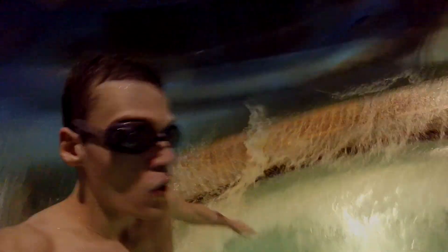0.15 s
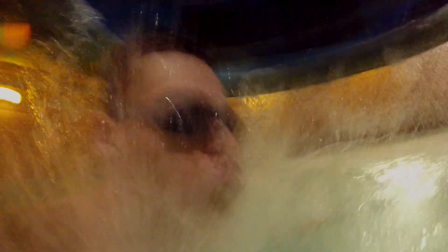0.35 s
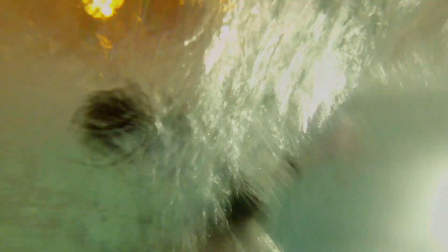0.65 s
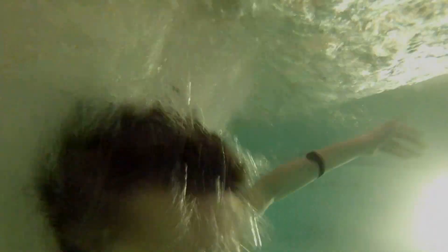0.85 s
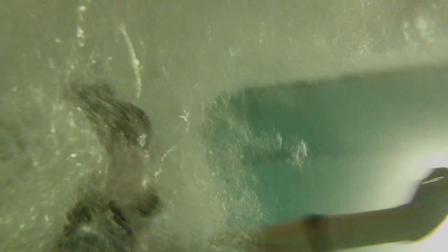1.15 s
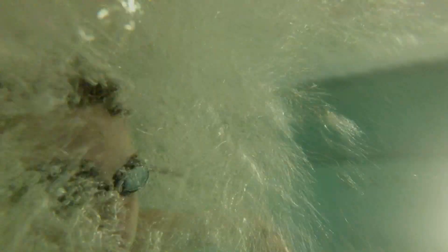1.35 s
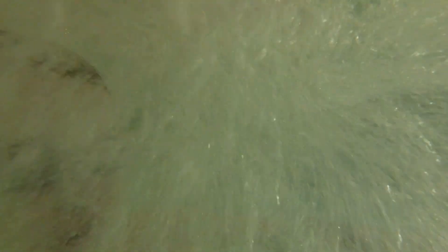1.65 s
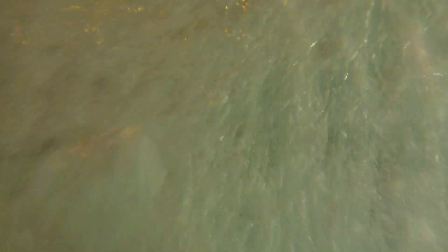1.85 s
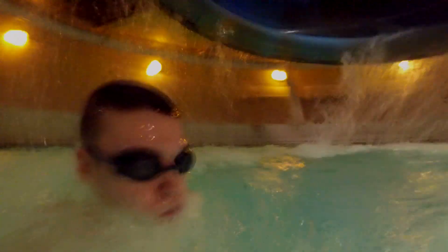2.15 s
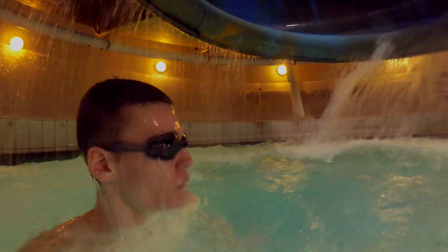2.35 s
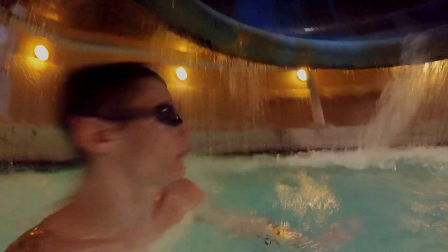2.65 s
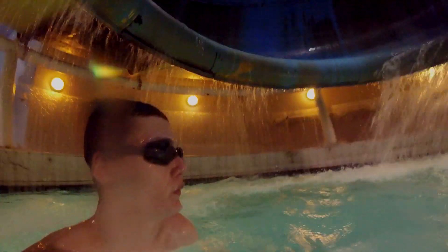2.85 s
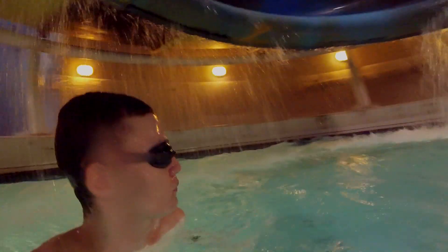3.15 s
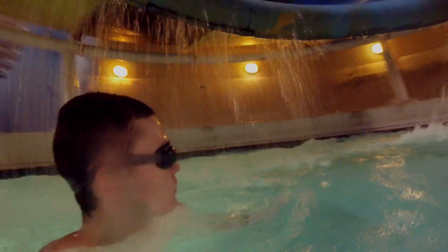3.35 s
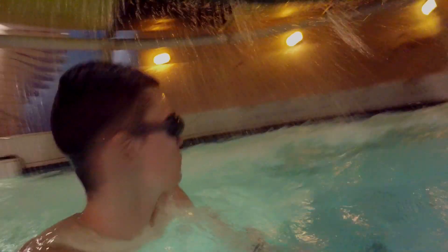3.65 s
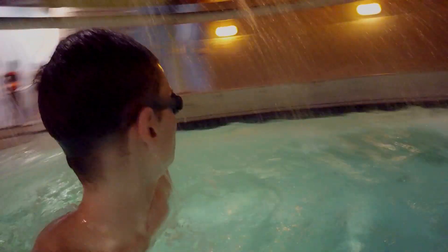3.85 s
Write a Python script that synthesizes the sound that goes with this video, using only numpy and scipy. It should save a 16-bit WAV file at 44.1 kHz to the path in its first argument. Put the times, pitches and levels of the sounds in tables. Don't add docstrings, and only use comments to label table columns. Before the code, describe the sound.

Water roar at an indoor pool, a hard plunge, bubbly submersion, then surfacing into brightening rush

```python
import sys
import numpy as np
from scipy import signal
from scipy.fft import rfft, irfft, next_fast_len
from scipy.io import wavfile
from scipy.ndimage import uniform_filter1d, map_coordinates

SR = 44100
rng = np.random.default_rng(int(sys.argv[2]) if len(sys.argv) > 2 else 0)


def put_to_file(sound):
    columns = np.atleast_2d(sound).T
    safe = np.clip(columns, -1, 1)
    whole_steps = np.round(safe * 32767)
    wavfile.write(sys.argv[1], SR, whole_steps.astype(np.int16))


def voltage_ratio(decibels):
    exponent = np.asarray(decibels, float) / 20
    return 10 ** exponent


N = 176400


def unit(x):
    return x / np.sqrt(np.mean(x ** 2) + 1e-20)


def along(points, hz):
    f, v = np.transpose(points)
    return np.interp(np.log(hz + 1), np.log(f + 1), v)


def curves(rows):
    s, db, *cols = np.transpose(rows)
    t = np.arange(N) / SR
    gate = np.clip(np.minimum(t - s[0] + .01, s[-1] + .01 - t) * 100, 0, 1)
    return [gate * voltage_ratio(np.interp(t, s, db))] + [np.interp(t, s, c) for c in cols]


def wobble(rate):
    knots = rng.standard_normal(int(N * rate / SR) + 4)
    return map_coordinates(knots, [np.arange(N) * rate / SR])


def filtered(x, response):
    m = next_fast_len(N + SR // 2)
    return irfft(rfft(x, m) * response(np.fft.rfftfreq(m, 1 / SR)), m)[:N]


def coloured(x, spectrum):
    return unit(filtered(x, lambda hz: voltage_ratio(along(spectrum, hz))))


def rush(spectrum, patchy_db):
    z = signal.stft(rng.standard_normal(N), nperseg=256)[2]
    field = uniform_filter1d(rng.standard_normal(z.shape), size=4, axis=0)
    field = uniform_filter1d(field, size=8, axis=1)
    x = signal.istft(z * voltage_ratio(patchy_db * unit(field)), nperseg=256)[1][:N]
    return coloured(x, spectrum)


def bubbles(spectrum, low_hz, octaves, cycles, rise, spread_db, count):
    u, t = rng.random((count, 3)), np.arange(1500) / SR
    hz = low_hz * 2 ** (octaves * u[:, 1:2])
    life = np.minimum(cycles / hz, t[-1])
    tone = np.sin(2 * np.pi * hz * t * (1 + rise * t / life))
    tone = tone * np.exp(-3 * t / life) * (1 - np.exp(-t * hz))
    size = voltage_ratio(-spread_db * np.log(u[:, 2:] + 0.055)) * hz
    at = (u[:, :1] * N).astype(int) + np.arange(len(t))
    x = np.bincount(at.ravel(), (tone * size).ravel(), N)[:N]
    return coloured(x, spectrum)


# (time [s], level [dB])
ROAR_LEVEL = [(0, -19), (.44, -18.5), (.444, -38.5), (.471, -37), (.475, -57.5), (.515, -43), (.57, -51),
              (.62, -52.5), (.68, -54), (.72, -59), (.745, -62)]
# (frequency [Hz], level [dB])
ROAR_LOW = [(12, -28), (214, -8.5), (950, -16), (1600, -15), (2250, -8), (2700, -18), (3900, -40.5),
            (6600, -85)]
ROAR_TREBLE = [(2500, -41.5), (4570, -18), (5840, -17.5), (6500, -4), (7500, -13.5), (9100, 2),
               (10000, -15), (10200, -59), (11000, -94)]
SUNK_TREBLE = [(2500, -21.5), (3500, -14), (5500, -22), (6500, -3), (7500, -20), (10000, -52)]
SLOSH_SPECTRUM = [(12, -5), (40, 26.5), (280, 16.5), (700, -65.5)]


def waterfall():
    level, = curves(ROAR_LEVEL)
    sunk = np.arange(N) > 0.475 * SR
    slosh = voltage_ratio(-6) * unit(voltage_ratio(2.5 * wobble(25)) * rush(SLOSH_SPECTRUM, 2.5))
    low = voltage_ratio(0.4 * wobble(40)) * rush(ROAR_LOW, 2.5)
    treble = voltage_ratio(-19.5) * np.where(sunk, 0.88 * rush(SUNK_TREBLE, 3), rush(ROAR_TREBLE, 0.46))
    spatter = np.where(sunk, unit(voltage_ratio(5.7 * wobble(59.1))), 1)
    return level * spatter * (low + treble + slosh)


# (time [s], level [dB])
FILM_LEVEL = [(1.98, -56.5), (2.09, -49), (2.115, -43), (2.4, -37), (2.553, -34.5), (2.556, -62.5),
              (2.61, -55)]
# (frequency [Hz], level [dB])
FILM_SPECTRUM = [(60, -20), (500, 0), (1000, 6), (2200, 0), (2600, -14), (5500, -19), (8000, -38),
                 (14000, -100)]


def wet_port():
    level, = curves(FILM_LEVEL)
    return level * rush(FILM_SPECTRUM, 0.79)


def port(x, peak_hz):
    notch_ratio, notch_wide_hz, peak_wide_hz = 1.205, 298, 525
    f, t, z = signal.stft(x, SR, nperseg=512)
    f, c = f[:, None], np.interp(t, np.arange(N) / SR, peak_hz)
    dip = (c * notch_ratio) ** 2 - f * f + 1j * f * notch_wide_hz
    peak = c * c - f * f + 1j * f * peak_wide_hz
    return unit(signal.istft(z * np.abs(dip / peak), SR, nperseg=512)[1][:N])


# (time [s], level [dB], port cleared [0-1], port resonance [Hz])
DRAINING = [(2.625, -51, 0.04, 5690), (2.85, -37, 0, 5900), (3.15, -32.5, 0.03, 5760),
            (3.4, -31, 0.76, 4420), (3.7, -27, 0.92, 4320), (3.962, -25, 0.96, 4120),
            (3.968, -40, 0.52, 4130), (4, -33, 1, 4180)]
# (frequency [Hz], level [dB])
DAMP_SPECTRUM = [(25, -0.5), (450, -0.5), (750, 2.5), (1950, 5), (2700, -3), (7200, -5), (9000, -27.5),
                 (12000, -71)]
CLEAR_SPECTRUM = [(25, -13.5), (400, -3.5), (3000, -11), (6000, -17.5), (6600, -4), (7500, -14),
                  (11500, -30.5), (13000, -79.5)]


def draining_port():
    level, cleared, peak_hz = curves(DRAINING)
    cleared = np.clip(cleared, 0, 1)
    damp = np.sqrt(1 - cleared) * rush(DAMP_SPECTRUM, 1)
    clear = np.sqrt(cleared) * port(rush(CLEAR_SPECTRUM, 0.61), peak_hz)
    return level * (damp + clear)


# (time [s], level [dB], small bubbles [0-1])
CLOUD_LEVEL = [(.54, -38.5, 1), (.62, -37.5, 0), (.67, -41.5, 0.08), (.71, -48, 0.94), (.75, -30, 1),
               (.8, -30.5, 0), (.86, -34.5, 0), (.95, -37.5, 0.07), (1.05, -32, 0.2), (1.2, -28, 0.76),
               (1.33, -34.5, 0.5), (1.41, -30, 0.57), (1.47, -34, 0.83), (1.6, -32, 0.65),
               (1.74, -27.5, 0.6), (1.8, -31.5, 0.74), (1.9, -29.5, 0.99), (2.35, -53.5, 1)]
# (frequency [Hz], level [dB])
BIG_BUBBLES = [(150, -31.5), (250, -11.5), (600, -11), (850, -25.5), (2000, -48), (3000, -62.5),
               (8000, -100)]
SMALL_BUBBLES = [(330, -2), (520, -6.5), (850, 1.5), (1080, -7.5), (1340, -32.5), (2300, -49.5),
                 (6000, -63), (9000, -100)]
CRACKLE_SPECTRUM = [(800, -27.5), (2000, -4), (3200, -18.5), (7000, -27.5), (10000, -69)]


def bubbly_wash(spectrum):
    ringing = bubbles(spectrum, 150, 3.3, cycles=11, rise=.09, spread_db=2, count=1300)
    return unit(ringing + .8 * rush(spectrum, 2.5))


def bubble_cloud():
    level, small = curves(CLOUD_LEVEL)
    small = np.clip(small, 0, 1)
    cloud = np.sqrt(1 - small) * bubbly_wash(BIG_BUBBLES) + np.sqrt(small) * bubbly_wash(SMALL_BUBBLES)
    fizz = bubbles(CRACKLE_SPECTRUM, 1200, 1.6, cycles=6.2, rise=.03, spread_db=15.5, count=900)
    snaps = bubbles(CRACKLE_SPECTRUM, 2500, 0.84, cycles=1.6, rise=0, spread_db=6.5, count=200)
    return level * (cloud + voltage_ratio(-45) * (fizz + 0.2 * snaps))


# (time [s], level [dB], frequency [Hz], negative
# pulls first, ring to -30 dB [s])
GLUG_EVENTS = [(.496, -17.5, 389, 0.0064), (0.521, 1, 594, 0.0016), (0.53, -3.5, -80.5, 0.019),
               (0.549, -15.5, 575, 0.018), (0.565, -8.5, -480, 0.01), (0.612, -15.5, 572, 0.014),
               (0.7564, -3.5, 66, 0.017), (0.763, 14, -135, 0.004), (0.766, -16.5, 242.5, 0.064),
               (0.795, -14, 257, 0.049), (1.2058, -8, 1340, 0.0053), (1.2048, -17, 2554, 0.005),
               (1.2055, -9.5, 195, 0.0073), (1.97, -16.5, 40.5, 0.15), (2.084, -16.5, 62, 0.036),
               (2.096, -18, -98, 0.032), (2.108, -17, -190, 0.017), (2.257, -11, -53.5, 0.11),
               (2.303, -11, -105, 0.026)]
# (time [s], level [dB], frequency [Hz])
SURGE_EVENTS = [
    (0.03, -11, 223),
    (0.103, -12.5, 166),
    (0.194, -24, 173),
    (0.267, -11, 263),
    (0.358, -19.5, 184),
]


def glugs():
    out, t = np.zeros(N + SR), np.arange(SR // 4) / SR
    surges = [(s, db + 0.5, hz, 3 / hz) for s, db, hz in SURGE_EVENTS]
    for s, db, hz, rings in GLUG_EVENTS + surges:
        shape = voltage_ratio(db - 1 - 30 * t / rings) * (1 - np.exp(-10 * t * abs(hz))) ** 2
        out[round(s * SR):][:len(t)] += shape * np.sin(2 * np.pi * hz * t)
    return out[:N]


# (time [s], level [dB], decay to -60 dB [s])
SLAP_EVENTS = [
    (0.4958, -30, 0.0091),
    (0.5228, -10, 0.0018),
    (.529, -4.5, 0.013),
    (0.758, -25, 0.03),
    (1.2063, -21, 0.0035),
    (1.89, -41, 0.016),
]
# (frequency [Hz], bandwidth [Hz], level [dB])
CASE_MODES = [(1333, 377, 8.5), (2000, 710, 8), (2614, 576, 2.5), (6370, 460, -13), (8600, 1200, -25.5)]


def peaks(table, f):
    return sum((-1) ** k * voltage_ratio(db) * 1j * f * w / (c * c - f * f + 1j * f * w)
               for k, (c, w, db) in enumerate(table))


def slaps():
    out, t = np.zeros(N + SR), np.arange(SR // 4) / SR
    for s, db, t60 in SLAP_EVENTS:
        shape = voltage_ratio(db + 10.0 - 60 * t / t60) * (1 - np.exp(-9 * t / t60))
        out[round(s * SR):][:len(t)] += shape * rng.standard_normal(len(t))
    return filtered(out[:N], lambda f: 0.011 / (1 + 1j * f / 6000) + peaks(CASE_MODES, f))


# (time [s], level [dB])
FILM_POPS = [
    (2.6113, -3),
    (2.72, -29),
]


def film_pops():
    input_hz, input_damp, leak_hz, snap_hz = 39.5, 1.33, 9.8, 2206
    step = np.zeros(N)
    for s, db in FILM_POPS:
        step[round(s * SR)] = -voltage_ratio(db) * SR / (2 * np.pi)

    def response(f):
        vent = 1j * f / (1j * f + leak_hz)
        high_pass = -1j * f / (f * f - input_hz ** 2 - 1j * f * input_damp * input_hz)
        return vent * high_pass / (1 + 1j * f / snap_hz)

    return filtered(step, response)


# (time [s], level [dB], frequency
# [Hz])
TICK_EVENTS = [(0.5287, -7.5, 2040), (0.562, -25, 1880), (0.609, -29.5, 2360), (.793, -22.5, 1870),
               (.848, -39.5, 1920), (1.04, -42.5, 2120), (1.198, -39.5, 3500), (1.203, -47, 5000),
               (1.228, -60, 3700), (0.935, -49, 1950), (.9, -47, 2100), (1.172, -53, 2200),
               (1.264, -48, 2600), (1.718, -41, 1980), (1.995, -54, 4270), (2.004, -54, 4180),
               (.652, -45, 2400), (.683, -43, 2130), (1.244, -34.5, 2500), (1.718, -38, 1590),
               (1.719, -47, 3026), (1.766, -50.5, 3200), (1.823, -43, 1905), (1.858, -46, 2940),
               (1.951, -41, 1870), (1.961, -34, 3150), (1.984, -32.5, 1730), (1.9815, -22, 877),
               (2.0231, -13.5, 1034), (0.912, -49, 2300)]


def ticks():
    out, t = np.zeros(N + SR), np.arange(SR // 4) / SR
    for s, db, hz in TICK_EVENTS:
        rough = 1 + 0.12 * map_coordinates(rng.standard_normal(230), [t * 900])
        shape = voltage_ratio(db + 1 - 60 * t * hz / 33) * (1 - np.exp(-1.6 * t * hz)) ** 2
        out[round(s * SR):][:len(t)] += shape * rough * np.sin(2 * np.pi * hz * t)
    return out[:N]


# (time [s], level [dB], frequency [Hz])
BLOOP_EVENTS = [(0.716, -24, 850), (0.895, -21, 715), (0.928, -27, 455), (1.029, -20, 859),
                (1.047, -27, 556), (1.094, -24, 452), (1.128, -20, 667), (1.167, -20, 490),
                (1.183, -14.5, 748), (1.224, -14.5, 704), (1.23, -22.5, 764), (1.248, -17.5, 817),
                (1.278, -26.5, 490), (1.409, -14.5, 741), (1.496, -17.5, 894), (1.522, -21.5, 950),
                (1.628, -24, 823), (1.656, -22, 668), (1.696, -20, 920), (1.719, -17, 933),
                (1.743, -20.5, 804), (1.817, -19.5, 458), (1.847, -18.5, 918), (1.889, -19, 686),
                (1.995, -22, 1030), (2.043, -19, 1030), (2.061, -29, 1000), (2.083, -21.5, 1084),
                (2.104, -21, 1450), (2.114, -22.5, 1620), (2.124, -20, 1530), (2.164, -30, 1520),
                (2.206, -24.5, 970)]


def bloops():
    ring_cycles, rise = 36.6, .04
    out, t = np.zeros(N + SR), np.arange(SR // 8) / SR
    for s, db, hz in BLOOP_EVENTS:
        u = t * hz
        shape = voltage_ratio(db - 2.5 - 60 * u / ring_cycles) * (1 - np.exp(-1.2 * u)) ** 2
        out[round(s * SR):][:len(t)] += shape * np.sin(2 * np.pi * u * (1 + rise * u / 10))
    return out[:N]


# (time [s], level [dB])
GURGLE_LEVEL = [(1.97, -39.5), (2.03, -45.5), (2.12, -37), (2.22, -43), (2.3, -51)]
# (frequency [Hz], level [dB])
THROAT_SPECTRUM = [(700, -23), (1050, -6), (1300, -13), (1600, -13.5), (2300, -19), (5000, -60)]


def gurgle():
    level, = curves(GURGLE_LEVEL)
    return level * bubbles(THROAT_SPECTRUM, 900, 1.1, cycles=20, rise=.05, spread_db=2.5, count=900)


# (time [s], level [dB], frequency [Hz])
POCKET_TONE = [(1.37, -47, 194.4), (1.424, -27, 194.5), (1.482, -40.5, 216.6), (1.546, -30, 199.7),
               (1.658, -32.5, 221.7), (1.698, -24, 206), (1.802, -43.5, 229), (1.82, -23.5, 221),
               (1.92, -52, 211)]


def air_pocket():
    level, hz = curves(POCKET_TONE)
    phase = 2 * np.pi * np.cumsum(hz) / SR
    tone = wobble(27.86) * np.cos(phase) + wobble(27.86) * np.sin(phase)
    return voltage_ratio(-3) * level * unit(tone)


# (time [s], level [dB])
SWIRL_LEVEL = [(.54, -29.5), (.7, -41), (.8, -32), (.92, -47), (1.2, -32), (1.33, -31), (1.45, -29),
               (1.7, -34), (1.9, -35), (2.1, -38), (2.3, -25), (2.43, -51), (2.55, -42)]
# (frequency [Hz], level [dB])
DEEP_SPECTRUM = [(12, -34.5), (40, -2), (150, -7.5), (205, -14.5), (270, -18), (520, -23), (880, -100)]


def swirl():
    level, = curves(SWIRL_LEVEL)
    ringing = bubbles(DEEP_SPECTRUM, 120, 1.3, cycles=9, rise=.08, spread_db=4, count=240)
    return 0.76 * level * unit(ringing + .7 * rush(DEEP_SPECTRUM, 3))


def scene():
    roar = waterfall() + wet_port() + draining_port()
    impacts = glugs() + slaps() + film_pops() + ticks()
    water = bubble_cloud() + bloops() + gurgle() + air_pocket() + swirl()
    return (roar + impacts + water)[None]


def low_pass(x):
    return signal.sosfilt(signal.butter(12, 11990, fs=SR, output="sos"), x)


def record(dry):
    step_s, start_s, step_db = .032, .0233, .9
    block = ((np.arange(N) / SR + step_s - start_s) / step_s).astype(int)
    gain = voltage_ratio(step_db * rng.standard_normal(block[-1] + 1))[block]
    gain = uniform_filter1d(uniform_filter1d(gain, size=3), size=3)
    mix = dry * gain
    mix = mix / (1 + np.abs(mix) ** 4) ** (1 / 4)
    return low_pass(mix)


dry = scene()
out = record(dry)
put_to_file(out)
```